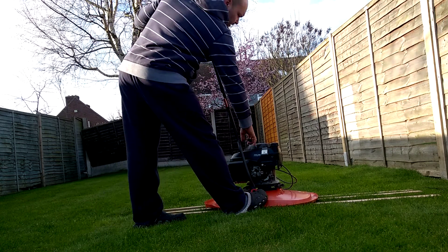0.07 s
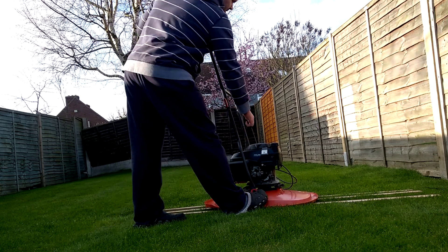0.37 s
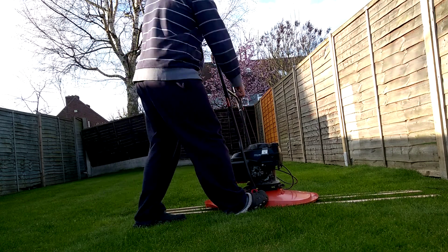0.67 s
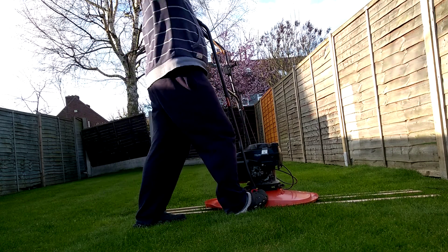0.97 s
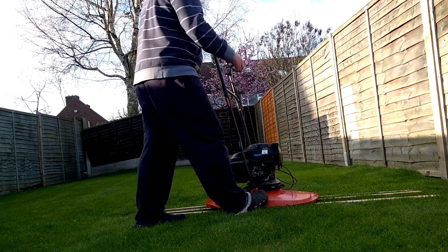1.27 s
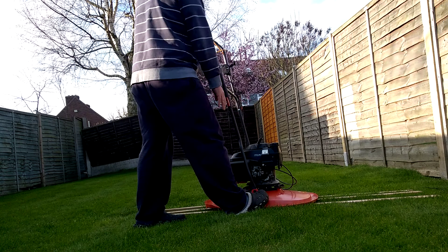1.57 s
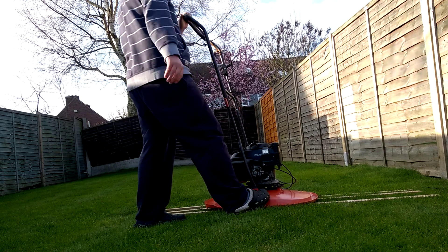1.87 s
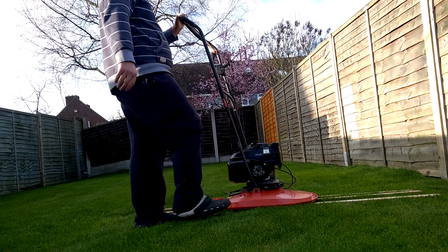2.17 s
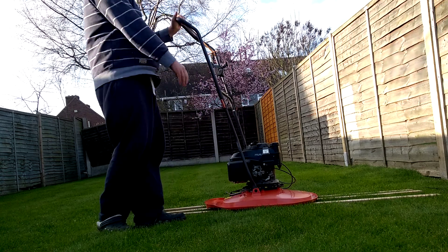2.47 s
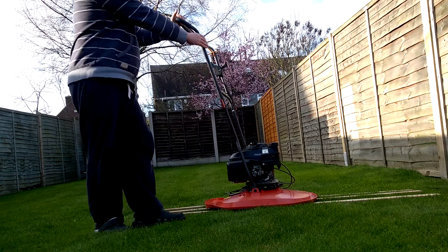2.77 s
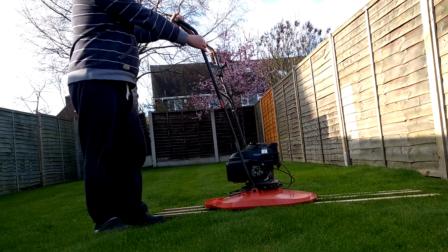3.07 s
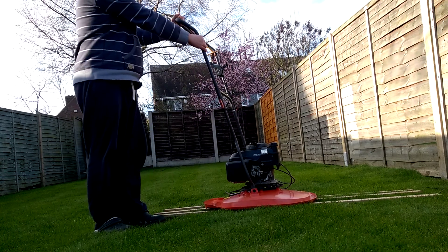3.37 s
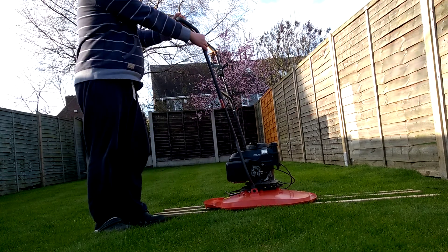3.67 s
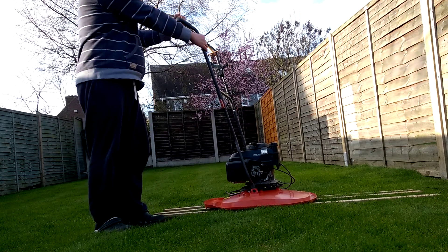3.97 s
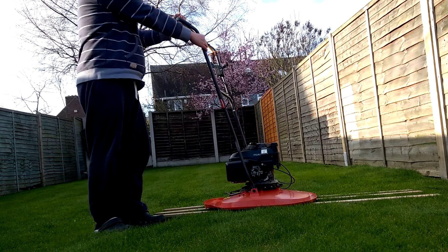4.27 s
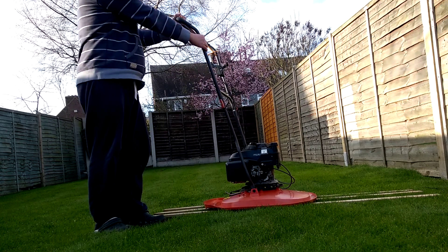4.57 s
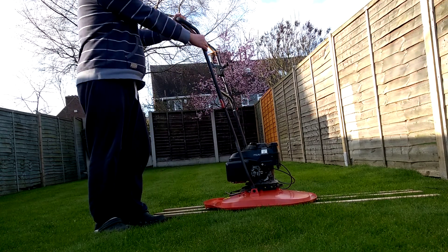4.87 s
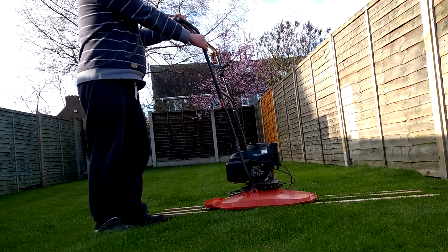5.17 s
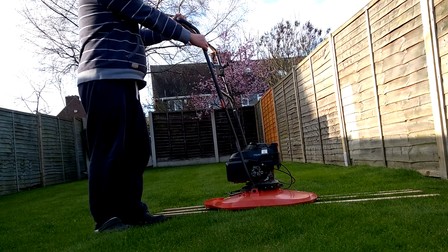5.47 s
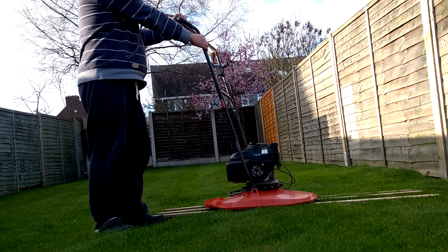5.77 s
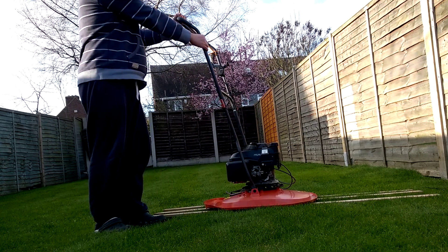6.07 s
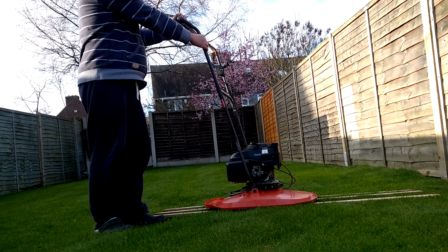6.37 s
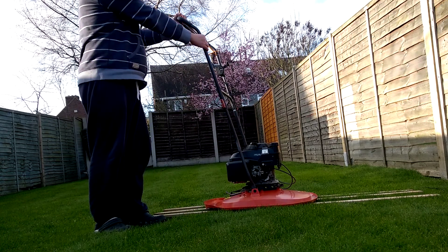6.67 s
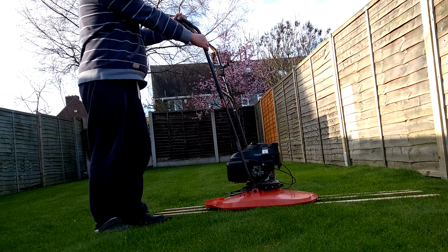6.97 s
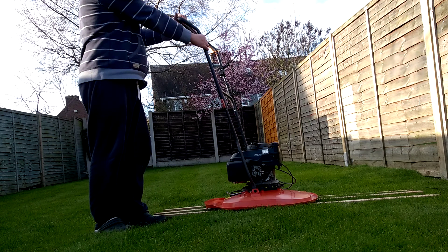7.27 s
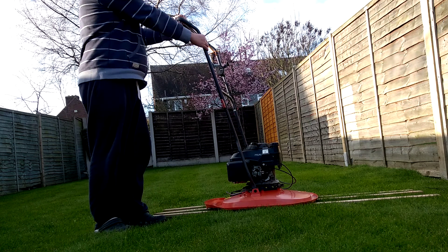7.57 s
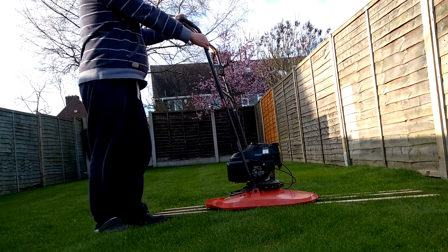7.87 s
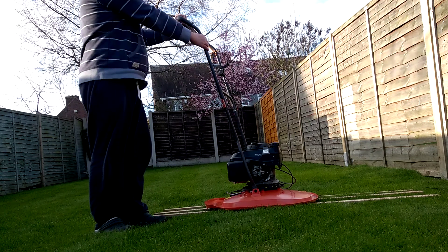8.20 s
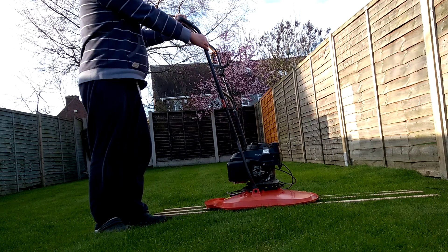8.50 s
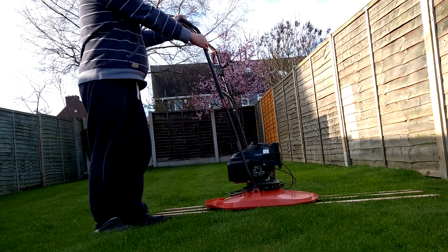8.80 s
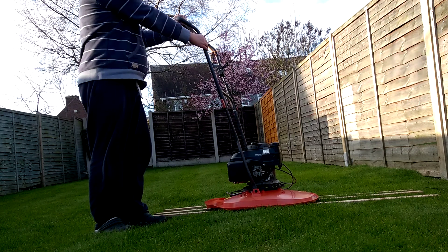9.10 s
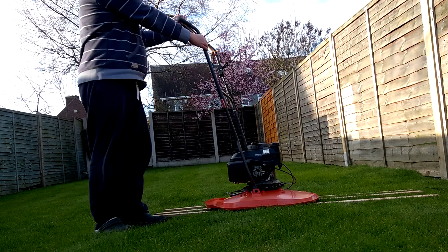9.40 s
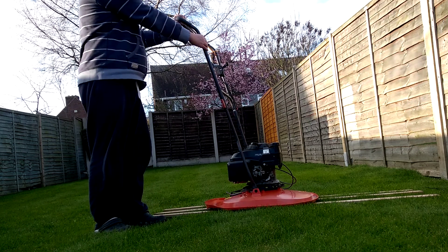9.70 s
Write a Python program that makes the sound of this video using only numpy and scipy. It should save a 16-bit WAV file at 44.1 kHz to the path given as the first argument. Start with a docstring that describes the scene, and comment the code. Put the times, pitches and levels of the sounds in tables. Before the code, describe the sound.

A few clicks and the short whirr of a pull cord start a small petrol lawn mower nearby in a garden. The engine chugs slowly, the starter handle clacks home, and the beats quicken into a loud growl. The mower soon settles into an even, throbbing drone with hissing exhaust, metallic ticks and a rush of air, staying in one place and running to the end.

```python
"""Pull-starting a hover mower

On a fenced lawn, the starter catches, the rope whirrs out and the handle snaps back.
The four-stroke engine puffs, races up and settles at the speed its governor holds.
Each engine cycle gives thumps of air, a hiss of exhaust gas and valve ticks,
while the fan and blade rush and hum."""
import sys
import numpy as np
from scipy import signal
from scipy.fft import rfft, irfft, next_fast_len
from scipy.io import wavfile
from scipy.ndimage import uniform_filter1d

SR = 44100
rng = np.random.default_rng(int(sys.argv[2]) if len(sys.argv) > 2 else 0)


def master_out(mix):
    """Clip the mix to full scale and print it as 16-bit PCM to the path in sys.argv[1]."""
    frames = np.transpose(np.atleast_2d(mix))
    ceiling = np.clip(frames, -1, 1)
    pcm = np.round(ceiling * 32767).astype(np.int16)
    wavfile.write(sys.argv[1], SR, pcm)


N = 438354
TIME = np.arange(N) / SR
SETTLED_HZ = 30.3  # engine cycles per second; the crank turns twice in each cycle

# The bright hiss in the exhaust, ticks and pulley: pitch_hz, level_db
HISS = [(300, 8), (700, 6), (1500, -3), (2500, 5), (4300, 3.5), (5500, 0), (8000, -5.5), (10500, -6.5),
        (12500, -10), (14300, -6), (16000, -13)]
# Ringing of the valve gear and starter cup: pitch_hz, width_hz, level_db
STEEL = [(1720, 60, -6), (3020, 150, -10), (3680, 90, -5), (4500, 500, 0), (4800, 50, 3)]


def undb(db):
    """Turn decibels into a number to multiply by."""
    return 10 ** (np.asarray(db) / 20)


def ramp(from_s, to_s):
    """A straight rise from 0 to 1 between two times."""
    return np.clip((TIME - from_s) / (to_s - from_s), 0, 1)


def swell(peak_s, width_s):
    """A bell-shaped rise and fall."""
    return np.exp(-.5 * ((TIME - peak_s) / width_s) ** 2)


def wander(rate_hz):
    """A random drift, roughly between -1 and 1."""
    hold = int(SR / rate_hz)
    steps = np.repeat(rng.standard_normal(N // hold + 1), hold)
    return np.sqrt(2) * uniform_filter1d(steps, hold)[:N]


def per_cycle(cycle):
    """One random value held for each engine cycle."""
    return rng.standard_normal(512)[np.floor(cycle).astype(int)]


def add(out, start_s, sound):
    """Mix a sound in at a given time."""
    start = int(start_s * SR)
    out[:, start:start + sound.shape[1]] += sound


def colour(x, curve, share=1):
    """Shape the tone with a curve of (pitch_hz, level_db) points; share scales the decibels."""
    hz, db = np.transpose(curve)
    size = next_fast_len(N)
    bins_hz = np.fft.rfftfreq(size, 1 / SR)
    gain = undb(share * np.interp(np.log(bins_hz + 1), np.log(hz), db))
    return irfft(rfft(x, size) * gain, size)[..., :N]


def noise(curve):
    """Shaped stereo noise, alike on both sides in the bass and wide in the treble."""
    # How strongly the two sides differ: pitch_hz, level_db
    stereo_width = [(60, -9), (150, -22), (300, -9), (600, -10), (1200, -9.5), (2500, -8), (4500, -9.5),
                    (8000, -0.5), (14000, 0)]
    mid, side = colour(rng.standard_normal((2, N)), curve)
    side = colour(side, stereo_width)
    return np.array([mid + side, mid - side]) / np.std(mid)


def resonate(x, hz, width_hz):
    """Let a sound ring at one pitch."""
    return signal.lfilter(*signal.iirpeak(hz, hz / width_hz, fs=SR), x)


def body(x, resonances):
    """Let a sound ring at several pitches."""
    return sum(undb(db) * resonate(x, hz, width) for hz, width, db in resonances)


def garden(level_db=-60.5):
    """A faint, wavering outdoor rumble."""
    rumble = noise([(15, -16), (28, 1), (65, -4), (110, -15), (250, -16), (600, -29),
                    (1300, -38), (1800, -38), (3600, -36), (7000, -47), (15000, -60)])
    return rumble * undb(level_db + 2 * wander(10.2))


def ring(tones, age, detune=.012, spread=.2):
    """A struck object rings a little differently with every blow and on each side."""
    hz, db, ring_s = np.transpose(tones)[:, :, None]
    hz = hz * (1 + detune * rng.standard_normal(hz.shape))
    waves = np.sin(2 * np.pi * hz * age) * undb(db - 60 * age / ring_s)
    return (1 + spread * rng.standard_normal((2, len(tones)))) @ waves / 2


def knocks(bounce_s=.011, bounce_db=-12.5, shake_db=-26):
    """The pull jolts the deck; catches, rope stop and handle hit the starter case and bounce once."""
    # Jolts to the deck, the shell over the blade: start_s, level_db
    jolts = [(.128, -48), (.526, -45), (.544, -29.5), (.679, -37), (.905, -49)]
    # Hits on the starter case: start_s, level_db, extra_ring_db
    hits = [(.097, -57, -3), (0.13, -45.5, -13), (0.541, -30.5, -9), (.66, -46, -8), (0.754, -37, -7),
            (.959, -21.5, 0.5), (1.387, -29.5, -10), (1.5016, -13, -12), (1.51, -15, 12), (1.5425, -39, 10)]
    # Tones of the deck: pitch_hz, level_db, ring_s
    deck = [(208, -16, 0.21), (244.6, 1, 0.25), (370, 3, 0.08), (530, -4.5, 0.066), (1110, -8.5, .07),
            (1810, -12, 0.13), (3670, -10, .13)]
    # Tones of the starter case: pitch_hz, level_db, ring_s
    housing = [(1420, -40, .06), (1730, -19, .08), (1890, -8, 0.055), (2210, -4, 0.028), (2610, 1.5, 0.025),
               (2760, -7.5, 0.054), (3176, -33, .05), (3610, -29, 0.1), (4650, -25, 0.048),
               (6030, -16, 0.048)]
    # The crack of a hit: pitch_hz, level_db
    crack_tone = [(300, 4), (1200, -0.5), (2500, 3), (5500, -7), (8000, -12), (11000, -13.5), (15500, -23)]
    ringing, bursts, age = np.zeros((2, N)), np.zeros((1, N)), TIME[:SR // 2]
    fade = np.exp(-age / .0027) + undb(-17) * np.exp(-age / .018)  # sharp snap, soft tail
    for start_s, db in jolts:
        add(ringing, start_s, undb(db) * ring(deck, age))
    for start_s, db, ring_db in hits:
        for at_s, size in ((start_s, undb(db)), (start_s + bounce_s, undb(db + bounce_db))):
            clang = undb(ring_db) * ring(housing, age) + undb(shake_db) * ring(deck, age)
            add(ringing, at_s, size * clang)
            add(bursts, at_s, size * fade[None])
    cracks = bursts * noise(crack_tone)
    return ringing + undb(-3.5) * cracks + body(cracks, STEEL)


def handling(rustle_db=-67, thud_db=-28):
    """A sleeve rustles as the slack is taken up; the mower rocks with a soft thud during the pull."""
    rustle = noise([(1500, -28), (3800, 6), (6000, -8), (14000, -24)]) * swell(.36, .032)
    thud = resonate(-swell(.738, .0022), hz=70, width_hz=99)
    return undb(rustle_db) * rustle + undb(thud_db) * thud


def rope(pull_s=.52, release_s=.95, home_s=1.48, grip_s=.018, settle_s=.2, pulley_hz=2450):
    """The cord rubs through its guide hole in jerks and the pulley whines; a spring winds it back."""
    # Rubbing of the cord: pitch_hz, level_db
    rub_tone = [(100, 14), (240, 21.5), (500, 9), (1000, 4), (2000, 2), (4500, 2), (7000, -7), (15500, -16)]
    # Hiss of the cord in its guide hole: pitch_hz, level_db
    guide_tone = [(1500, -20), (4000, -2), (7000, -6), (11000, 0), (15500, 3)]
    speed = swell(peak_s=.89, width_s=.13)
    released = ramp(release_s, release_s + grip_s)
    pulling = ramp(pull_s, pull_s + grip_s) - released
    rewinding = released - ramp(home_s, home_s + settle_s)
    rub = pulling * undb(-54 + 2 * speed) + rewinding * undb(-46 + 6.5 * (TIME - release_s))
    whine_hz = pulley_hz * speed * (1 + .057 * wander(570))
    whine = np.sin(2 * np.pi * np.cumsum(whine_hz) / SR)
    pulley = pulling * undb(-52 + 20 * (speed - 1)) * (whine + undb(-1) * noise(HISS))
    hiss = pulling * ramp(pull_s, pull_s + settle_s) * undb(-60) * noise(guide_tone)
    return (noise(rub_tone) * rub + hiss) * undb(3.5 * wander(90)) + pulley


def fan(cycle, octaves, level_db):
    """Air rushes through the fan, chopped by the blade tips; the rush has a few narrow bright peaks."""
    # Rushing air: pitch_hz, level_db
    air_tone = [(100, -17), (200, -5.5), (320, -6), (404, 1), (519, -4.5), (592, -2.5), (867, -6.5),
                (1330, -9), (1600, -14), (2270, -18), (4200, -18.5), (5400, -26.5), (8000, -36),
                (15800, -46)]
    # Narrow bright peaks in the rushing air: pitch_hz, width_hz, level_db
    air_peaks = [(2670, 270, -16), (4150, 860, -7.5), (7030, 180, -4)]
    chopping = 1 + .061 * np.cos(2 * np.pi * 4 * cycle)  # two tips, two turns a cycle
    air = noise(air_tone) * chopping * undb(level_db + 14 * octaves + .42 * wander(25))
    return air + body(air, air_peaks)


def growl(cycle, octaves, place=.112, slope_db=-2, even_db=-4):
    """The hard-working crank gives a dip in pressure on every turn, built from eight tones."""
    turns = 2 * (cycle - place)
    dips = 0
    for k in range(1, 9):
        db = slope_db * np.log2(k) + even_db * (k % 2 == 0)
        dips -= undb(db) * np.cos(2 * np.pi * k * turns)
    return undb(-29 + 3 * octaves) * dips


def hum(cycle, octaves, load_db):
    """The unbalanced crank and the blade hum; high tones waver in the rough air, and load adds a growl."""
    # Tones of crank and blade: waves_per_cycle, level_db
    harmonics = [(1, -39), (2, -40.5), (4, -32.5), (5, -38.5), (8, -40.5), (9, -46.5), (11, -41), (12, -51),
                 (14, -51), (16, -41.5), (19, -37.5), (20, -43), (24, -39.5), (34, -40)]
    wobbly = cycle + .0035 * wander(12)
    tones = 0
    for k, db in harmonics:
        waver_db = .5 * min(k / 20, 1) * wander(5)
        tones += undb(db + waver_db) * np.cos(2 * np.pi * k * wobbly)
    return np.sqrt(2) * (undb(12 * octaves) * tones + undb(load_db) * growl(wobbly, octaves))


def clatter(cycle, octaves, level_db=-39, fade_cycles=.011):
    """The piston and valve gear tick at the same places in every cycle."""
    # Ticks: place_in_cycle, level_db
    tick_places = [(.01, -6), (0.271, -13), (.51, -1), (.643, -6), (.703, -11), (.755, 0)]
    ticks = 0
    for place, db in tick_places:
        age = (cycle - place) % 1
        ticks += undb(db + per_cycle(cycle - place)) * np.exp(-age / fade_cycles)
    return noise(HISS) * ticks * undb(level_db + 8 * octaves)


def strokes(cycle, octaves, scatter_db, jitter_cycles):
    """Each stroke pushes or sucks a smooth pulse of air; at low speed it fills less of the cycle."""
    # Exhaust puff, its suck-back, intake and compression:
    # place_in_cycle, width_cycles, pressure, db_per_speed_doubling
    pulses = [(0, 0.016, 0.25, 3.5), (0.089, 0.013, -0.0018, -9), (0.282, 0.022, -0.31, 6.5),
              (0.668, 0.017, -0.26, 8)]
    push = 0
    for place, width, pressure, speed_db in pulses:
        shifted = cycle - place + .5
        offset = shifted % 1 - .5 + jitter_cycles * per_cycle(shifted)
        bell = np.exp(-.5 * (offset / (width * 2 ** (.2 * octaves))) ** 2)
        push += pressure * undb(speed_db * octaves + scatter_db * per_cycle(shifted)) * bell
    return push


def roar(cycle, octaves, honk_db=2, rumble_db=-27):
    """Uneven gulps of air make the air box honk, over a rumble from the deck."""
    # Ringing of the air box: pitch_hz, width_hz, level_db
    air_box = [(187, 17, -1), (233, 26, 2), (279, 21, 1.5), (382, 27, 1)]
    # Air churning in the deck: pitch_hz, level_db
    rumble_tone = [(25, -5), (60, -3), (120, 1.5), (200, 10.5), (290, 8), (400, -1), (700, -16),
                   (1500, -36), (6000, -80)]
    gulps = strokes(cycle, octaves, scatter_db=2, jitter_cycles=.0017)
    return undb(honk_db) * body(gulps, air_box) + undb(rumble_db) * noise(rumble_tone)


def blast(cycle, octaves, place=.13, width=.12):
    """Under load each exhaust stroke spits a bright jet of hot gas."""
    # The jet: pitch_hz, level_db
    jet_tone = [(1000, 0), (3000, 7), (4500, -11), (6000, 5), (8500, -2), (10700, 1), (12400, -7),
                (14200, 4), (16000, -4)]
    offset = (cycle % 1) / 2 ** (.77 * octaves) - place  # earlier and narrower in a slow cycle
    return noise(jet_tone) * np.exp(-(offset / width) ** 2) * undb(-33 + 4 * octaves)


def thumps(cycle, octaves, direct_db=-4):
    """Pulses of air are heard directly and also make the silencer and deck ring."""
    # Ringing of silencer and deck: pitch_hz, width_hz, level_db
    silencer = [(64, 36, -4.5), (162.2, 20, 0), (255, 61, -10.5), (380, 16, -11), (588, 22, -10),
                (800, 40, -16)]
    push = strokes(cycle, octaves, scatter_db=.5, jitter_cycles=.0024)
    push = signal.sosfilt(signal.butter(1, 30, "high", fs=SR, output="sos"), push)
    return undb(direct_db) * push + body(push, silencer)


def exhaust_hiss(cycle, octaves, leak_db=-24, rise_cycles=.016):
    """Gas hisses while the exhaust valve is open, ending earlier in a slow cycle."""
    # Gas bursts out, then the piston pushes out the rest: place_in_cycle, half_fade_cycles, level_db
    bursts = [(.005, 0.023, -0.5), (.07, 0.074, 1.5), (.25, .19, -5.5)]
    flow = undb(leak_db)
    for place, half_fade, db in bursts:
        age = (cycle - place) % 1
        flow += undb(db) * (1 - np.exp(-age / rise_cycles)) * np.exp(-age / (2 * half_fade))
    emptying_db = 40 * octaves * np.minimum(cycle % 1, .4)
    return noise(HISS) * flow * undb(-37 + emptying_db + 1.17 * per_cycle(cycle))


def cough(cycle, octaves, fade_cycles=.059):
    """The opening exhaust valve lets out a short, hollow cough."""
    # The cough: pitch_hz, level_db
    cough_tone = [(100, -21), (300, 4), (580, 5.5), (950, 3.5), (1300, -29), (2500, -11), (8000, -31)]
    return noise(cough_tone) * np.exp(-(cycle % 1) / fade_cycles) * undb(-32 - 2 * octaves)


def valve_click(age_s, octaves, fade_s=.009):
    """The exhaust valve snaps open once a cycle and sets the steel parts ringing."""
    click = rng.standard_normal((2, N)) * np.exp(-age_s / fade_s)
    return body(click, STEEL) * undb(-31 - 2 * octaves)


def chug(age_s, level_db=-24, pitch_hz=72, fade_s=.017):
    """At starting speed every puff leaves the silencer booming for a moment."""
    return -undb(level_db) * np.sin(2 * np.pi * pitch_hz * age_s) * np.exp(-age_s / fade_s)


def engine(first_puff_s=.96, settled_s=2.772, speed_drift=.0018):
    """Speed and throttle drive the running sounds; once settled, the speed drifts a little."""
    # The engine speeding up: time_s, cycles_per_s
    run_up = [(.96, 6.4), (1.15, 7.86), (1.37, 11.03), (1.6, 16.5), (1.85, 21.98), (2.1, 26.16),
              (2.35, 29.5), (2.7, 30.56), (3.5, 30.27)]
    turning = ramp(.77, 1.13)  # fades in as the crank starts to turn
    unlit = 1 - ramp(1.22, 1.54)  # falls to 0 as the fuel catches
    throttle = 1 - ramp(2.35, settled_s)  # falls to 0 as the governor eases off
    speed = np.interp(TIME, *np.transpose(run_up)) * (1 + speed_drift * (1 - throttle) * wander(1))
    cycle = np.cumsum(speed) / SR
    cycle -= np.interp(first_puff_s, TIME, cycle)  # cycles counted from the first puff
    age_s = (cycle % 1) / speed  # roughly the time since this cycle began
    octaves = np.log2(speed / SETTLED_HZ)  # 0 at settled speed, -1 at half of it
    warming_db = -1.54 * np.maximum(TIME - settled_s, 0)  # the load eases as the engine warms
    load_db = -13.5 + 16 * throttle - 6 * unlit + 10 * octaves + warming_db
    thump = undb(-1.5 - .5 * unlit) * thumps(cycle, octaves)
    strain = undb(load_db) * (roar(cycle, octaves=0) + blast(cycle, octaves))
    exhaust_db = 5 + 4.5 * throttle - 17 * unlit
    exhaust = undb(exhaust_db) * (exhaust_hiss(cycle, octaves) + cough(cycle, octaves))
    air = fan(cycle, octaves, level_db=-22.7 - 14 * unlit)
    puffs = thump + exhaust + valve_click(age_s, octaves) + unlit * chug(age_s)
    puffs *= cycle > -.2  # silent until just before the first puff
    return turning * (puffs + strain + air + hum(cycle, octaves, load_db) + clatter(cycle, octaves))


def fences(x, echo_db=-17, fade_s=.032, first_s=.0097):
    """Wooden fences send back a short, dull scatter of echoes, different on each side."""
    age = TIME[:SR // 2]
    echoes = rng.standard_normal((2, len(age))) * np.exp(-age / fade_s) * (age > first_s)
    echoes /= np.sqrt(np.sum(echoes ** 2, axis=1, keepdims=True))
    echoes = signal.sosfilt(signal.butter(2, [400, 6000], "band", fs=SR, output="sos"), echoes)
    return undb(echo_db) * signal.fftconvolve(x, echoes, axes=1)[:, :N]


def scene():
    """The mower and its echoes over a quiet garden."""
    mower = engine() + knocks() + rope() + handling()
    return mower + fences(mower) + garden()


def record(dry):
    """Sound reaches the left side slightly later, the sides differ in tone, and the top treble is cut."""
    # Tone curve, partly added on the left and partly taken off the right: pitch_hz, level_db
    tilt = [(60, 0), (110, 0.0), (200, 2.5), (380, 0.5), (700, -1), (1290, -1.0), (2380, 0.0), (4400, -0.5),
            (8120, -3.0), (15000, -3.5)]
    lag_samples, top_hz = 2, 15800
    left = np.pad(dry[0], (lag_samples, 0))[:N]
    sides = np.array([colour(left, tilt, share=.5), colour(dry[1], tilt, share=-.57)])
    return signal.sosfilt(signal.ellip(10, .2, 80, top_hz, fs=SR, output="sos"), sides)


dry = scene()
out = record(dry)
master_out(out)
```